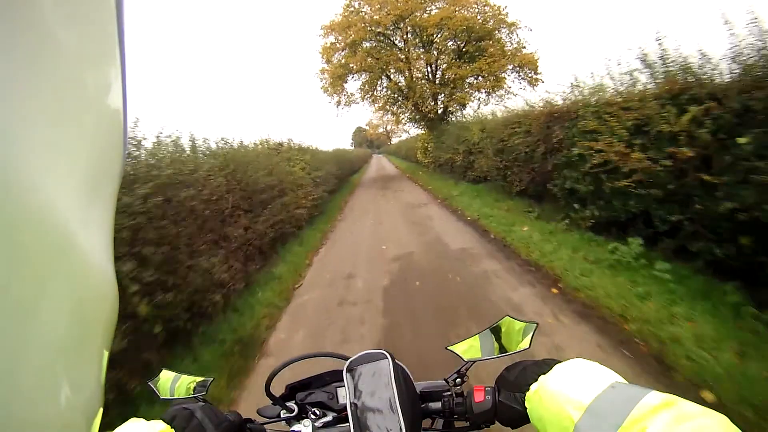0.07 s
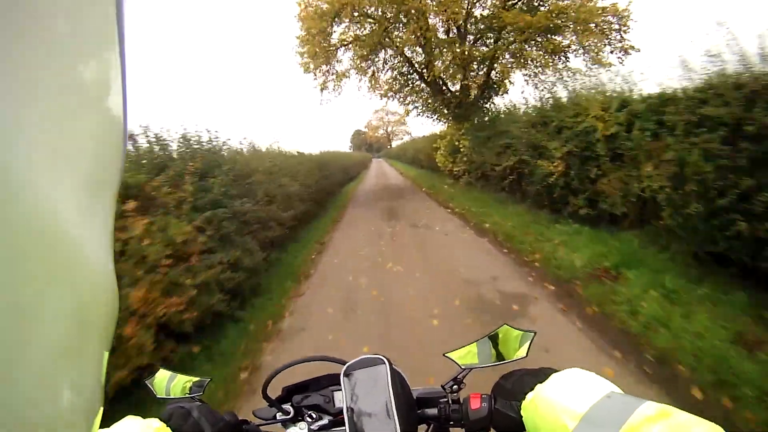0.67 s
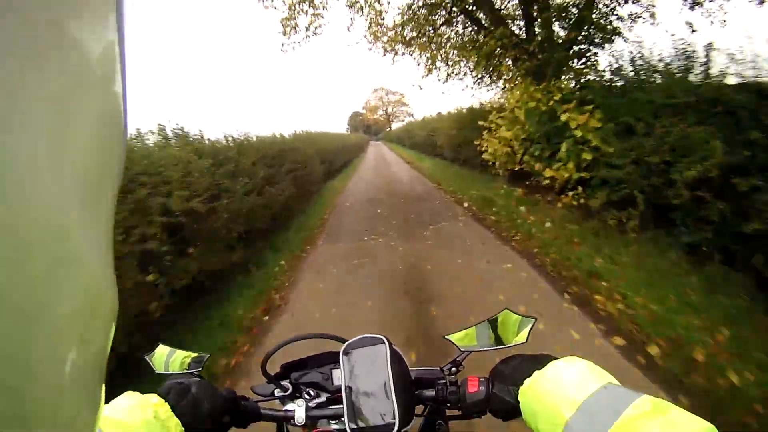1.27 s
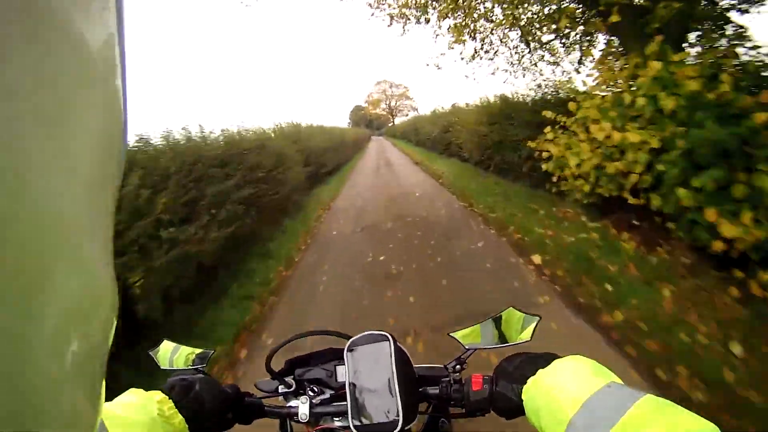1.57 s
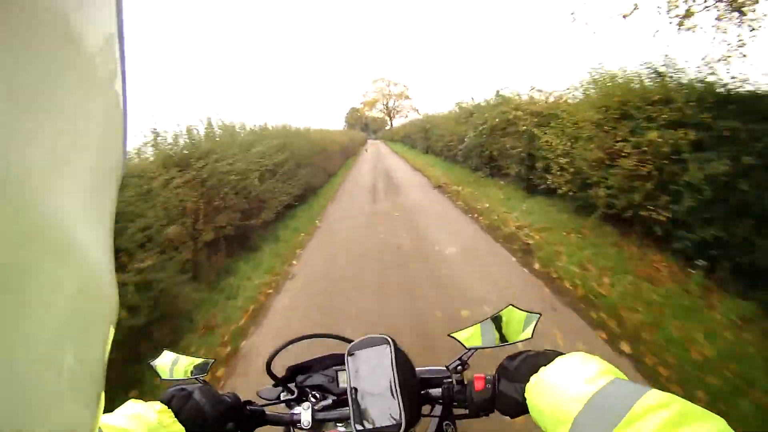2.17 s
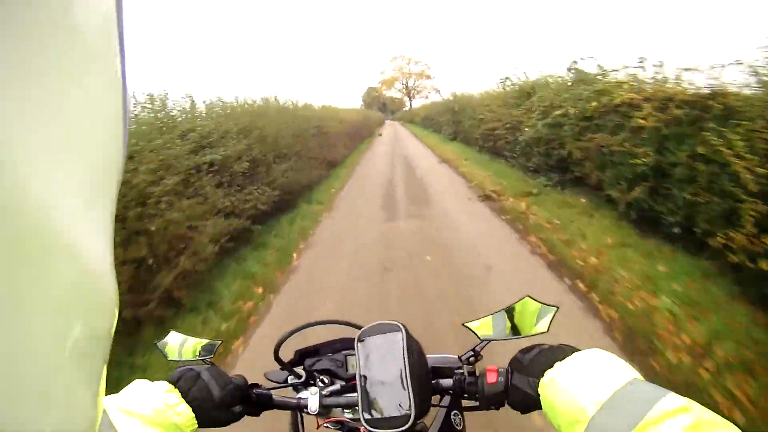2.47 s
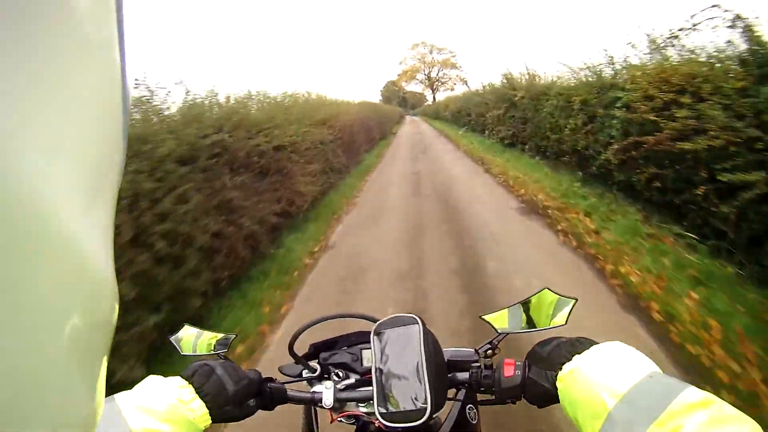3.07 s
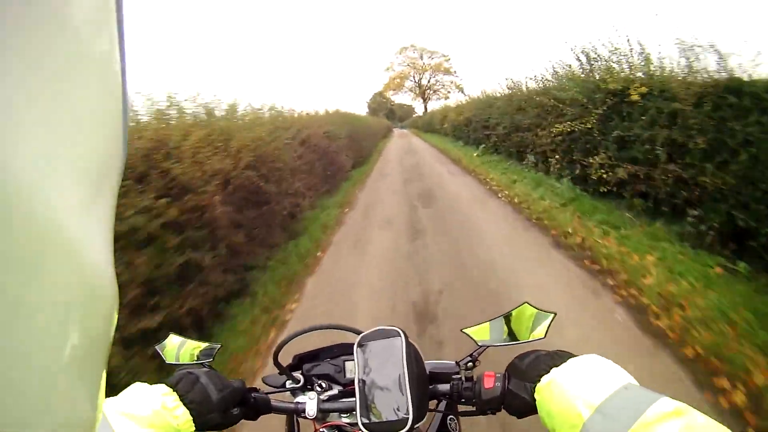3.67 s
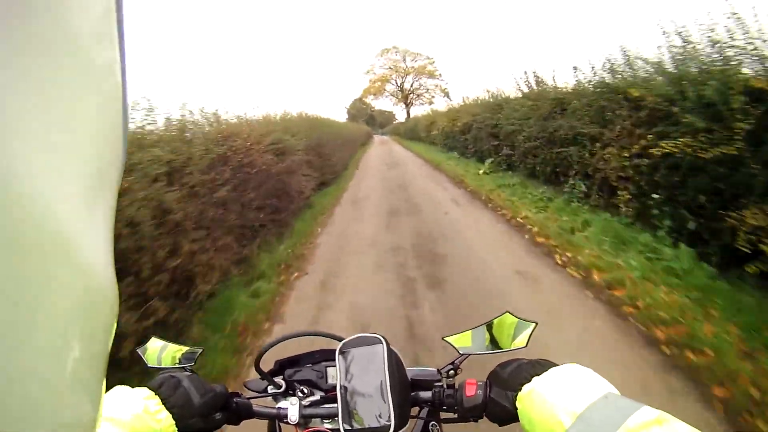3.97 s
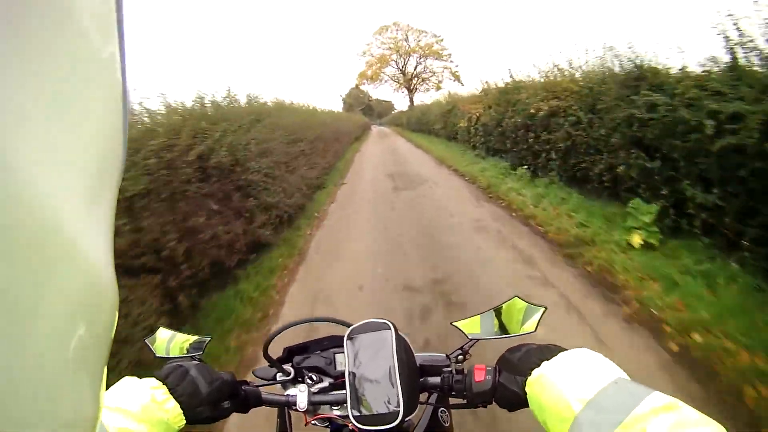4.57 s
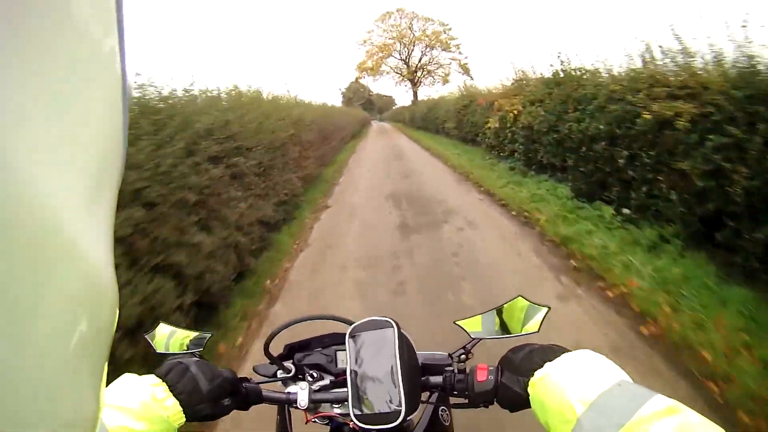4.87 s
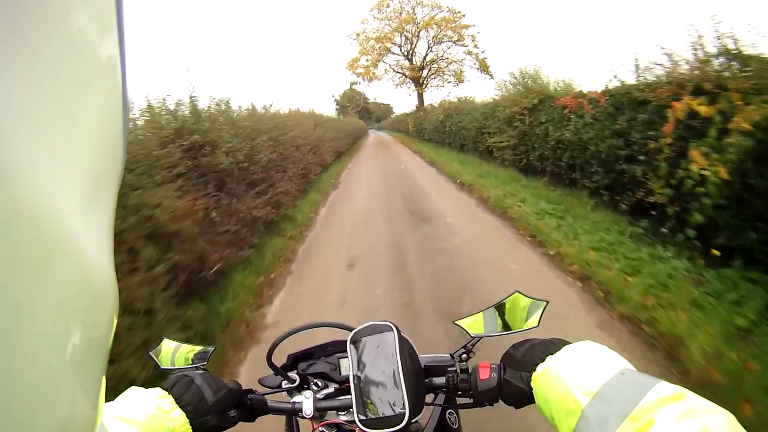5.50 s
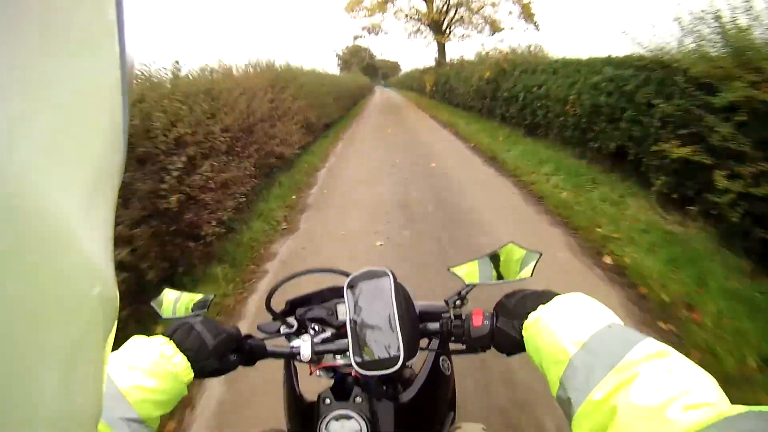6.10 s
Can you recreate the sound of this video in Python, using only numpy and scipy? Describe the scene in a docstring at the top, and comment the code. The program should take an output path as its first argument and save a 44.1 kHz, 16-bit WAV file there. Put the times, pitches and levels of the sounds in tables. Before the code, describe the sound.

A single-cylinder four-stroke motorcycle is already cruising along a country lane, heard close from the rider's chest. Its exhaust makes a rapid, low, thumping drone with a little hiss, joined by metallic valve ticking, a faint gear whine and a soft, even rush of tyres and air. The pitch holds for about 2 seconds, then sinks slowly. From about 4 seconds the engine labours, and its exhaust takes on a harder bark. Wind buffets the microphone with low rumbles, strongest at about 2.2 seconds and again near 2.9 and 3.5 seconds. Bumps knock the microphone with short, dull thumps: faintly at 1.1 seconds, more clearly at 2.1, 3.2, 3.7 and 3.9, and lightly at 5.4. The engine is still running, slightly lower, when the sound ends at about 6.3 seconds.

```python
"""A country lane, heard from the chest of a rider whose motorcycle is slowly losing speed.
Each firing of the single-cylinder four-stroke sends a pressure pulse and follow-up gas pulses out of the
exhaust with a puff of hiss, and barks harder as the engine labours. Valve gear rings the casings;
gears whine. Tyres and air rush underneath, gusts buffet the microphone and bumps knock its mount."""
import sys
import numpy as np
from scipy import signal
from scipy.fft import rfft, irfft
from scipy.io import wavfile
from scipy.ndimage import uniform_filter1d

SR = 44100
rng = np.random.default_rng(int(sys.argv[2]) if len(sys.argv) > 2 else 0)


def master_out(mix):
    """Clip the mix to full scale and print it as 16-bit PCM to the path in sys.argv[1]."""
    frames = np.transpose(np.atleast_2d(mix))
    ceiling = np.clip(frames, -1, 1)
    pcm = np.round(ceiling * 32767).astype(np.int16)
    wavfile.write(sys.argv[1], SR, pcm)


N = 279594
TIME = np.arange(N) / SR
FREQ = np.maximum(np.fft.rfftfreq(2 * N, 1 / SR), 1e-3)
CRUISE_HZ = 40  # firing rate

def undb(db):
    """Decibels to gain."""
    return 10 ** (np.asarray(db) / 20)

def seconds(ms):
    """Milliseconds to seconds."""
    return ms / 1000

def shape(x, response):
    """Filter by a response on FREQ."""
    return irfft(rfft(x, 2 * N) * response)[:N]

def lowpass(hz, order):
    """Zero-phase roll-off response."""
    return 1 / (1 + (FREQ / hz) ** order)

def modes(table, order=1):
    """Response of damped resonances; order 2 has steeper flanks."""
    return sum(undb(db) / (1 + 1j * (FREQ ** 2 - hz ** 2) / (FREQ * width_hz)) ** order
               for hz, width_hz, db in table)

def noise(spectrum, flow=1):
    """Turbulence, scaled by flow, then coloured by a density table."""
    hz, db = np.transpose(spectrum)
    density_db = np.interp(np.log(FREQ), np.log(hz), db)
    return shape(flow * rng.standard_normal(N), np.sqrt(SR / 2) * undb(density_db))

def walk(rate_hz):
    """Smooth random drift, unit spread."""
    hold = int(SR / rate_hz)
    steps = np.repeat(rng.standard_normal(N // hold + 1), hold)
    drift = uniform_filter1d(uniform_filter1d(steps, hold), hold)[:N]
    return drift / drift.std()

def clicks(times_s, sizes):
    """Impulses, each split between two samples."""
    place = np.clip(times_s * SR, 0, N)
    i, part = place.astype(int), place % 1
    return (np.bincount(i, sizes * (1 - part), N + 2) + np.bincount(i + 1, sizes * part, N + 2))[:N]

# Follow-up gas pulses at fixed crank angles: cruise_delay_ms, smear_ms, cruise_gain, loaded_gain
EXHAUST_PUSHES = [(.33, 0.77, 2.02, 3), (6.0, 0.85, -0.64, 3.5), (8.66, 1.075, -4, -0.5),
                  (11, 0.64, -0.05, 1.6), (14.1, 4.35, -5, -3)]
# Silencer chambers: pitch_hz, width_hz, level_db
SILENCER_MODES = [(165.5, 9.9, -6), (262, 150, -12), (490, 61, -12.5), (541.3, 10, -4.5), (644, 17, -5.5)]
def exhaust(fired_s, firing_hz, load, blow_ms=2.203, outlet_hz=136, gain_db=19.0):
    """Blow-down pulses boom in the silencer; follow-up gas pulses shape each thump."""
    scatter = rng.standard_normal((len(fired_s), len(EXHAUST_PUSHES) + 1)).T
    stretch = CRUISE_HZ / firing_hz  # pulses keep their crank angle, spreading as the engine slows
    size = stretch * undb(gain_db + .5 * scatter[0])
    waves = shape(clicks(fired_s, size), 1 + modes(SILENCER_MODES))
    for (delay_ms, smear_ms, cruise, loaded), push_scatter in zip(EXHAUST_PUSHES, scatter[1:]):
        strength = (cruise + (loaded - cruise) * load) * undb(.56 * push_scatter)
        pushes = clicks(fired_s + seconds(delay_ms) * stretch, size * strength)
        smear = np.exp(-.5 * (2 * np.pi * FREQ * seconds(smear_ms)) ** 2)
        waves += shape(pushes, smear)
    progress = np.minimum(TIME / seconds(blow_ms), 1)
    blow = progress ** 1.49 * (1 - progress)  # swells, ends in a steep front
    centring = np.exp(1j * np.pi * FREQ * seconds(blow_ms))
    pulse = rfft(blow / blow.sum(), 2 * N) * centring
    radiation = 1 / (1 + outlet_hz / (1j * FREQ))  # open end radiates little bass
    absorption = lowpass(1500, order=4)
    return -shape(waves, pulse * radiation * absorption)

def bark(fired_s, load, front_ms=.059, ring_hz=680, width_hz=420, gain_db=-18, load_db=15, scatter_db=4):
    """Under load the pressure front steepens and cracks at the outlet, differently each burn."""
    size = undb(gain_db + load_db * load + scatter_db * rng.standard_normal(len(fired_s)))
    fronts = clicks(fired_s + seconds(front_ms), size)
    ring = modes([(ring_hz, width_hz, 0)], order=2)
    return -shape(fronts, ring * lowpass(1800, order=6))

# Gas hiss: freq_hz, density_db
GAS_SPECTRUM = [(150, -82), (350, -78), (600, -77), (900, -87), (1200, -77), (1450, -79), (2300, -82.5),
                (3100, -83.5), (3700, -92), (4400, -103), (6300, -107), (9000, -120), (15000, -130)]
def gas_hiss(fired_s, load, lag_ms=.89, spit_ms=1.5, tail_ms=11, scatter_db=.8, load_db=2):
    """Gas spits behind each front, then fades; chopped by the valve, coloured by the silencer."""
    size = undb(load_db * load + scatter_db * rng.standard_normal(len(fired_s)))
    puff = .49 * np.exp(-TIME / seconds(spit_ms)) + .56 * np.exp(-TIME / seconds(tail_ms))
    flow = shape(clicks(fired_s + seconds(lag_ms), size), rfft(puff, 2 * N))
    return noise(GAS_SPECTRUM, flow)

# Taps after each firing: delay_cycles, level_db
VALVE_TAPS = [(.01, -3.5), (0.191, -2.5), (0.392, -7.5), (.64, -16.5), (0.848, -4)]
FIN_HZ = 2848
# Head, fins and casings: pitch_hz, width_hz, level_db
CASING_MODES = [(835, 120, -5.5), (1030, 47, -2), (1113, 120, 0), (1222, 70, -5), (1520, 160, -16),
                (2040, 110, -8), (FIN_HZ, 53, -11.5), (3090, 130, -23.5), (3100, 250, -29),
                (5120, 320, -30)]
def valves(fired_s, firing_hz, load, jitter_ms=.064, scatter_db=2, gain_db=-4, load_db=4.5, chain_db=-35):
    """Cams and valves tap the casings at set crank angles; the chain keeps them ringing."""
    delay_cycles, level_db = np.transpose(VALVE_TAPS)
    jitter, scatter = rng.standard_normal((2, len(fired_s), len(VALVE_TAPS)))
    times_s = fired_s[:, None] + delay_cycles / firing_hz[:, None] + seconds(jitter_ms) * jitter
    size = undb(level_db + scatter_db * scatter + load_db * load[:, None] + gain_db)
    taps = shape(clicks(times_s.ravel(), size.ravel()), lowpass(3600, order=8))  # oil softens contact
    chain = undb(chain_db) * rng.standard_normal(N)
    return shape(taps + chain, modes(CASING_MODES, order=2))

# Casing wall per gear pair: resonance_hz, width_hz, peak_db
WALL_MODES = [(1022, 48, -52), (852, 20, -52.5)]
def gear_whine(cycles, rate_hz, teeth_per_cycle=(26, 22), waver_db=2.4, wobble_rad=.26):
    """Teeth mesh at multiples of the firing rate; each tone swells through a wall resonance."""
    whine = 0
    for teeth, (resonance_hz, width_hz, peak_db) in zip(teeth_per_cycle, WALL_MODES):
        detuning = 2 * (teeth * rate_hz - resonance_hz) / width_hz
        gain = undb(peak_db + waver_db * walk(9)) / np.hypot(1, detuning)
        whine += gain * np.sin(2 * np.pi * teeth * cycles + wobble_rad * walk(24))
    return whine

# Tyre and air rush: freq_hz, density_db
ROAD_SPECTRUM = [(30, -56), (80, -65.5), (170, -64.5), (300, -69.5), (500, -70), (800, -81), (1150, -79.5),
                 (1500, -88), (2900, -110), (3600, -103), (4400, -112), (6500, -118), (9000, -123),
                 (15000, -127)]
def road_rush(swell_db=.2, flicker_db=.4):
    """Tyres and air rush, varying with the surface."""
    return noise(ROAD_SPECTRUM) * undb(swell_db * walk(1.974) + flicker_db * walk(20))

# Gusts: peak_s, length_s, level_db
WIND_GUSTS = [(.13, .22, -26), (1.86, .2, -27), (2.241, .09, -14.5), (2.559, 0.17, -27), (2.87, .28, -22.5),
              (3.543, .12, -22.5), (4.35, .15, -31)]
# Buffeting: freq_hz, relative_db
BUFFET_SPECTRUM = [(2, -13), (7, -6), (12, 0), (20, -8.5), (32, -17), (55, -33), (120, -55), (500, -89.5),
                   (15000, -170)]
def wind(rate_hz, cruise_db=-32, fall_db_per_hz=.5):
    """Slow eddies push on the microphone: gusts over a breeze that eases as speed drops."""
    breeze = undb(cruise_db - fall_db_per_hz * (CRUISE_HZ - rate_hz))
    gusts = [undb(level_db) * np.exp(-2 * ((TIME - peak_s) / length_s) ** 2)
             for peak_s, length_s, level_db in WIND_GUSTS]
    eddies = noise(BUFFET_SPECTRUM)
    return eddies / eddies.std() * np.sqrt(breeze ** 2 + sum(gust ** 2 for gust in gusts))

# Bumps: start_s, level_db
LANE_BUMPS = [(1.105, -28), (2.009, -26), (2.067, -17), (3.185, -23), (3.728, -20.5), (3.895, -15),
              (5.402, -26)]
# Mount resonances: pitch_hz, width_hz, relative_db
MOUNT_MODES = [(120, 67, 8), (190.7, 100, 17), (310, 100, -5.5)]
def bumps(cutoff_hz=420, shake_ms=16, knock_db=5, shake_db=-6):
    """Each bump knocks the mount with a dull thump and leaves it shaking briefly."""
    start_s, level_db = np.transpose(LANE_BUMPS)
    hits = clicks(start_s, undb(level_db))
    mount = modes(MOUNT_MODES)
    knocks = undb(knock_db) * shape(hits, mount / abs(irfft(mount)).max())
    tremor = shape(rng.standard_normal(N), mount)
    decay = shape(hits, rfft(np.exp(-TIME / seconds(shake_ms)), 2 * N))
    shakes = undb(shake_db) * decay * tremor / tremor.std()
    return shape(shakes - knocks, lowpass(cutoff_hz, order=6))

# Engine speed, holding then sagging: time_s, firing_hz
FIRING_RATE = [(0, 39.9), (0.8, 40.11), (2, 39.59), (4, 38.1), (5.2, 36.44), (6.34, 35.28)]
def scene(start_cycles=.529, burn_jitter_ms=.078, cruise_load=.073, load_doubling_hz=1.42):
    """The engine fires once a cycle and labours as it slows, amid road, wind and bumps."""
    rate_hz = np.interp(TIME, *np.transpose(FIRING_RATE))
    cycles = start_cycles + np.cumsum(rate_hz) / SR
    fired_s = np.interp(np.arange(1, cycles[-1]), cycles, TIME)
    fired_s += seconds(burn_jitter_ms) * rng.standard_normal(len(fired_s))
    firing_hz = np.interp(fired_s, *np.transpose(FIRING_RATE))
    load = np.minimum(cruise_load * 2 ** ((CRUISE_HZ - firing_hz) / load_doubling_hz), 1)
    tailpipe = exhaust(fired_s, firing_hz, load) + bark(fired_s, load) + gas_hiss(fired_s, load)
    casings = valves(fired_s, firing_hz, load) + gear_whine(cycles, rate_hz)
    return (tailpipe + casings + road_rush() + wind(rate_hz) + bumps())[None]

def record(dry):
    """Very short closing fade; steep cut of the top treble."""
    fade_ms, cutoff_hz = 4, 15700
    fade = np.minimum((TIME[-1] - TIME) / seconds(fade_ms), 1)
    return signal.sosfilt(signal.ellip(8, .2, 70, cutoff_hz, fs=SR, output="sos"), dry * fade)

dry = scene()
out = record(dry)
master_out(out)
```